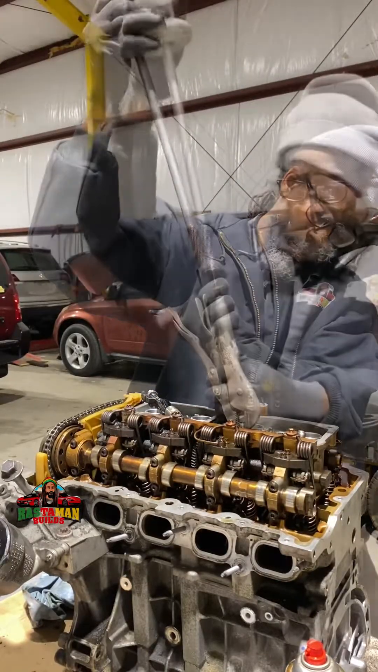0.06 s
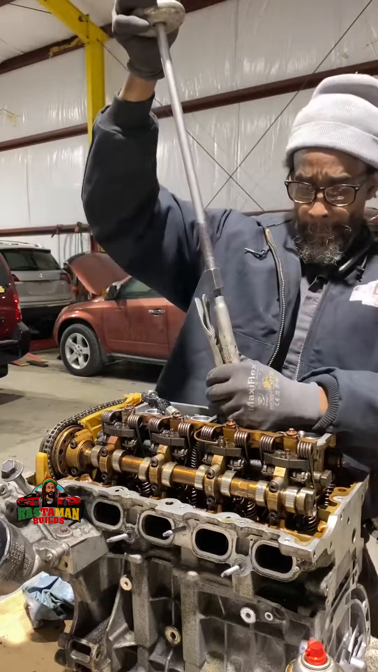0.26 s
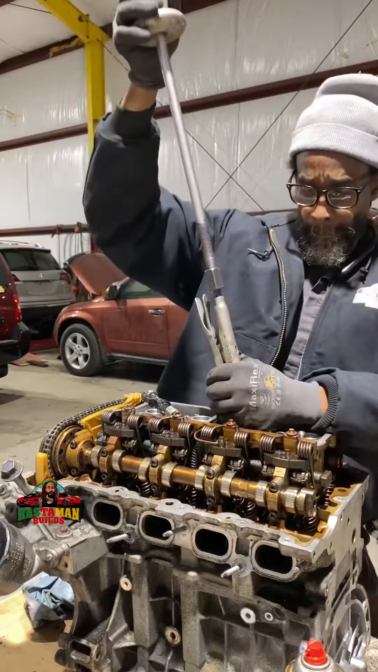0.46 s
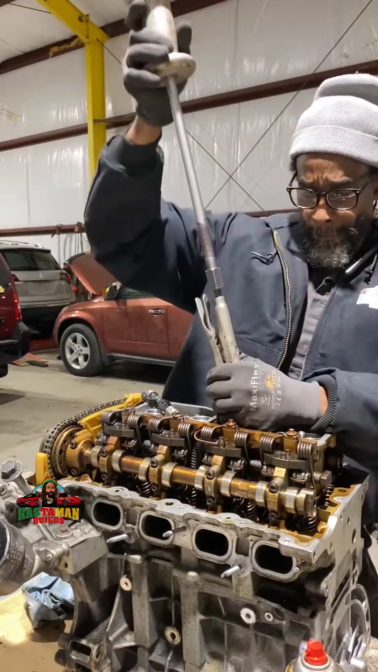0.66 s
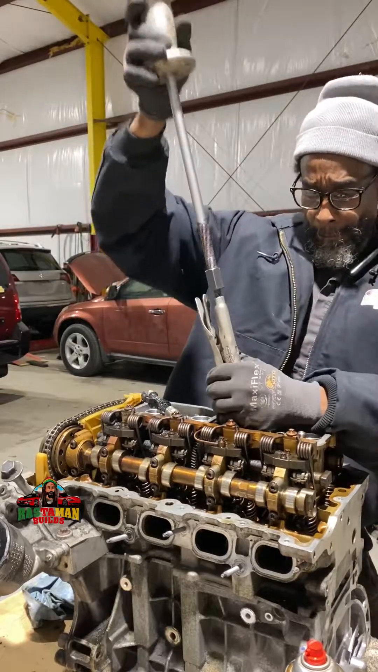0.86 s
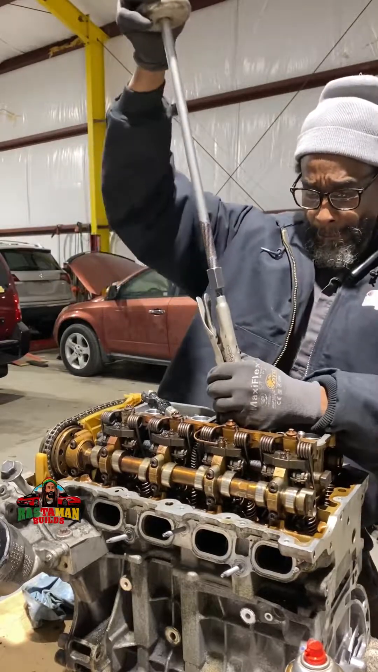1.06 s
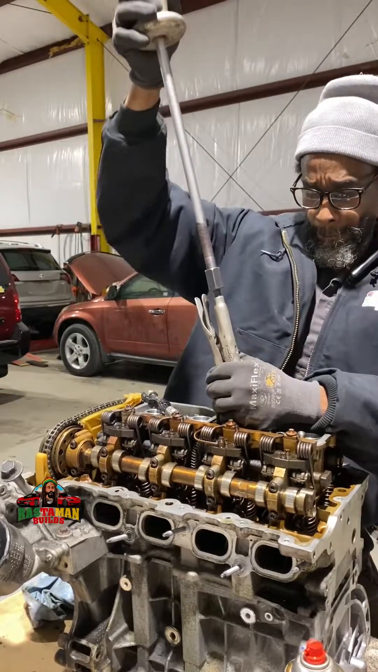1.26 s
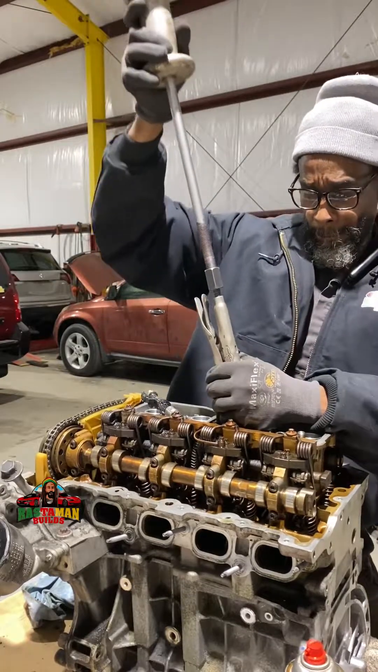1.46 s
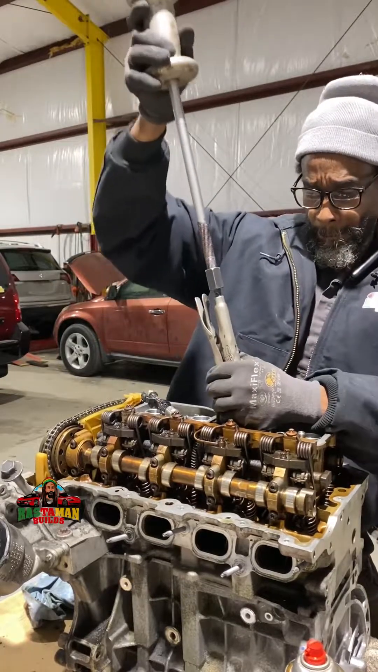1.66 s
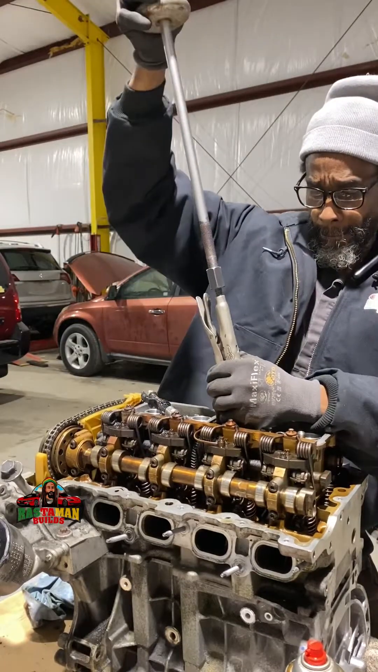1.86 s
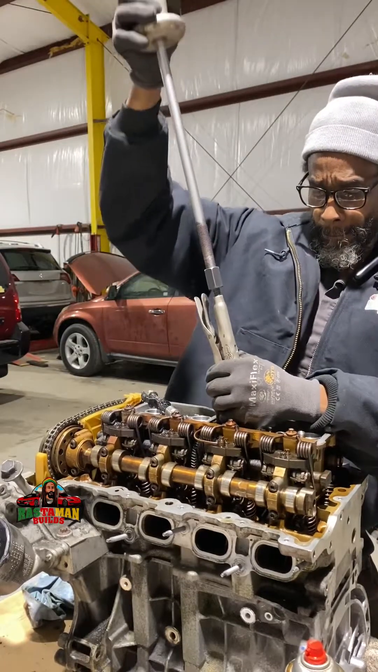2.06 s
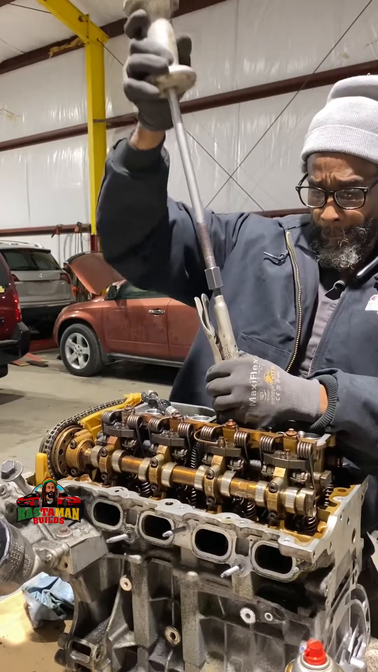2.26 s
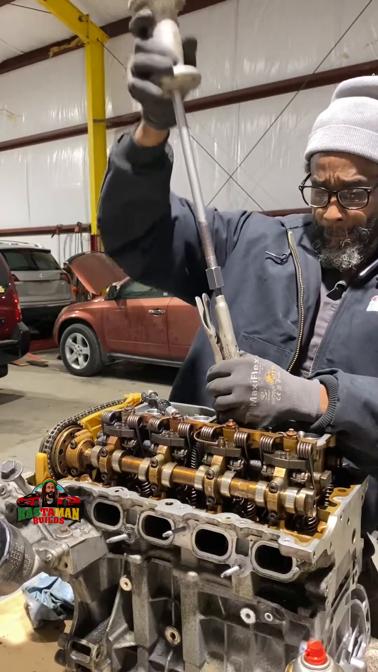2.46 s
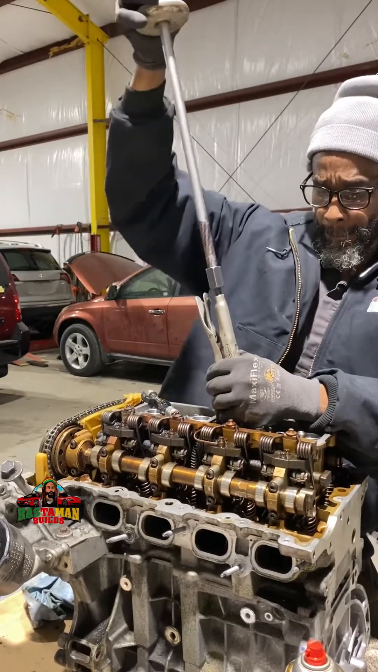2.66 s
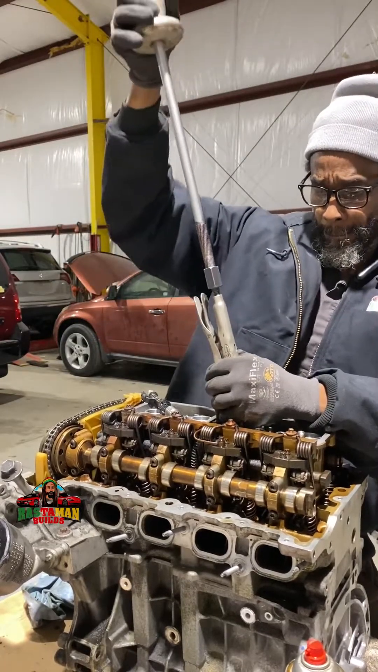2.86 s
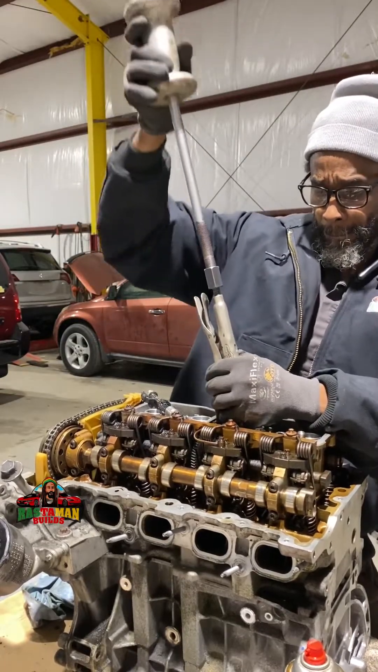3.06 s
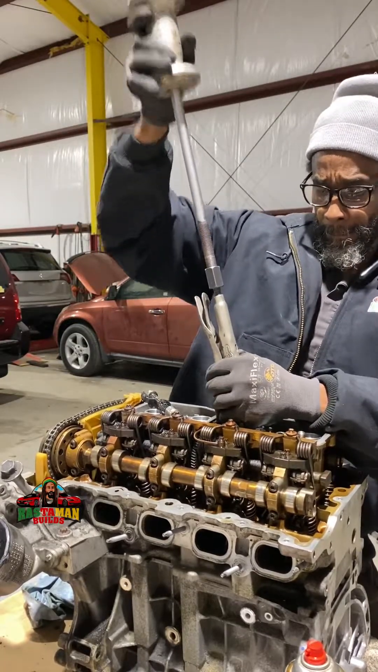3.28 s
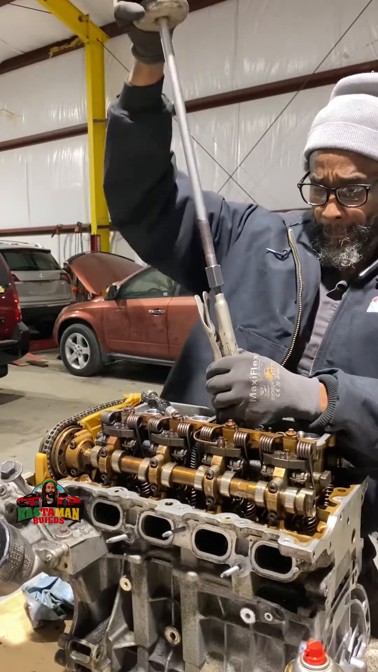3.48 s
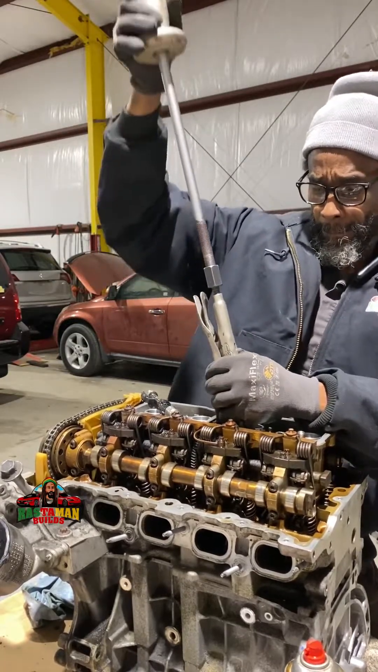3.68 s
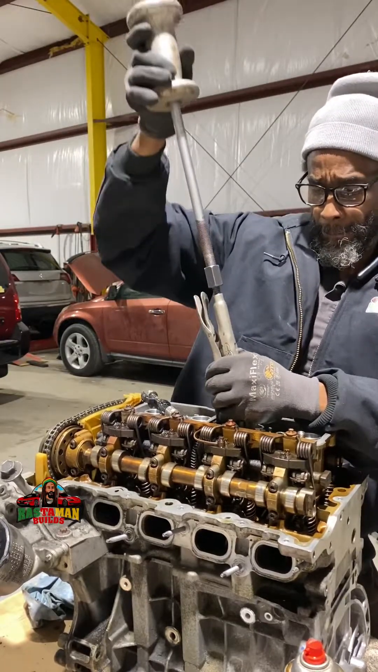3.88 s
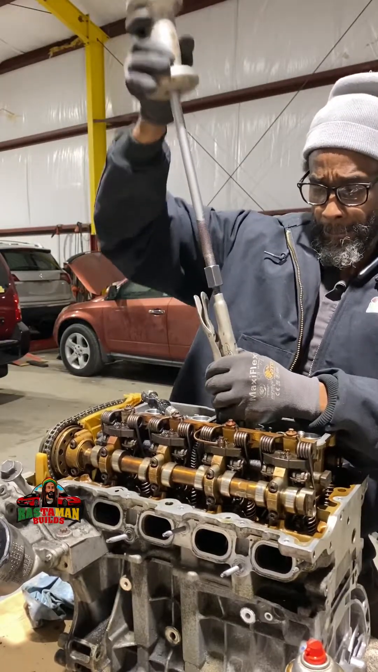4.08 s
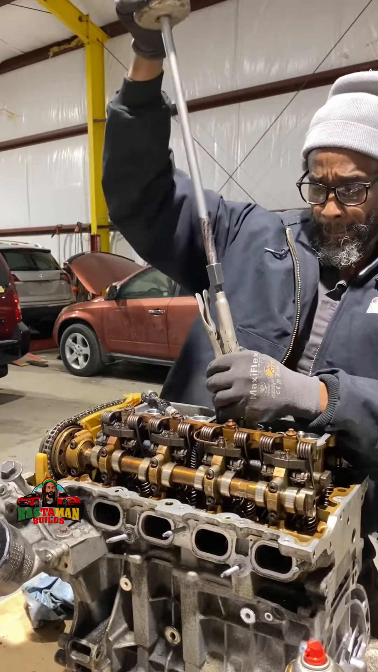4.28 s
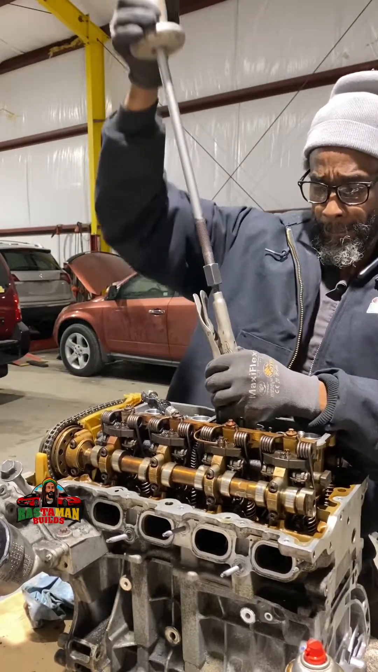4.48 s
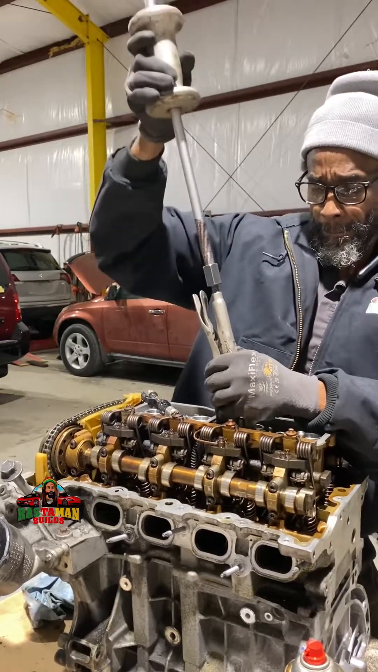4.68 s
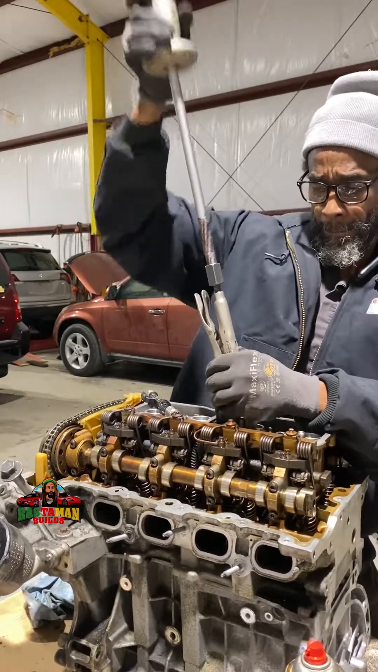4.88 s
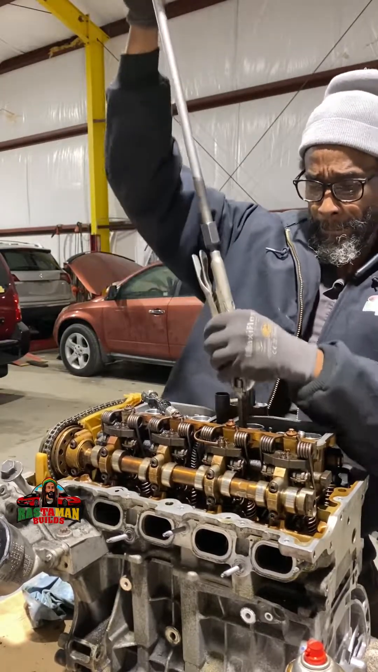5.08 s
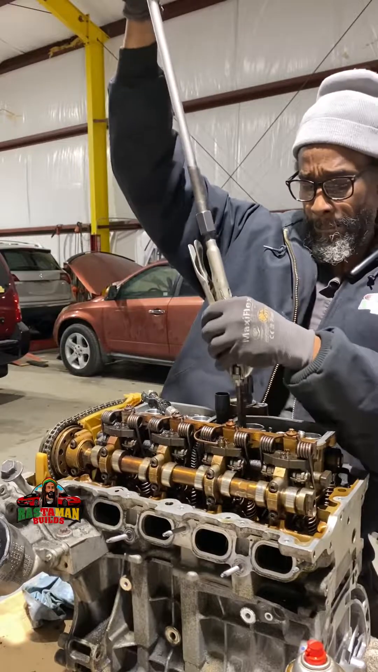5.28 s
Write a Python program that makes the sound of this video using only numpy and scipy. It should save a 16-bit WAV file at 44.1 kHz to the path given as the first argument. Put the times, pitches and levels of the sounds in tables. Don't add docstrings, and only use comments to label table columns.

```python
import sys
import numpy as np
from scipy import signal
from scipy.fft import rfft, irfft
from scipy.io import wavfile

SR = 44100
rng = np.random.default_rng(int(sys.argv[2]) if len(sys.argv) > 2 else 0)


def volts_from_decibels(level):
    exponent = np.asarray(level, float) / 20
    return 10 ** exponent


def dump(signal):
    limited = np.clip(np.atleast_2d(signal).T, -1, 1)
    pcm = np.round(limited * 32767).astype(np.int16)
    wavfile.write(sys.argv[1], SR, pcm)


N = 234948

# start_s, level_db (rms of the first 6 ms), length_ms, dull_db (per octave)
SLAM_EVENTS = [
    (0.1616, -17.5, 3, 3),
    (0.9306, -12, 5.7, -1.7),
    (1.7611, -12, 6.7, 0.3),
    (2.5595, -12.5, 6.5, -0.6),
    (3.3561, -12, 6.2, -0.8),
    (4.165, -12, 8.1, -0.14),
    (4.9309, -11.5, 9.6, -1.1),
]
# start_s, peak_db, strongest_mode_hz, dull_db (per octave), length_ms
RATTLE_EVENTS = [(0.259, -22.5, 2330, 2.5, 4.2), (0.3331, -22.5, 6200, -3.5, 9),
                 (0.4637, -20.5, 2360, 4.5, 10.4), (0.5199, -24.5, 1530, 1.5, 3.7),
                 (0.9887, -23, 6200, 0, 1.3), (1.1239, -16.5, 6180, -3, 2.1), (1.2905, -23, 3560, 5, 8.5),
                 (1.948, -27.5, 4470, 5, 5.4), (2.1083, -20.5, 5920, 0.5, 6.5),
                 (2.5795, -24.5, 2760, -6, 16), (2.7988, -25.5, 2970, 6, 5.3),
                 (3.5292, -33, 2740, 5.5, 7.4), (3.618, -26, 2400, 2.5, 4.7), (3.8168, -40.5, 3200, 7, 7.1),
                 (4.176, -18.5, 2690, 7, 6.8), (4.3573, -25.5, 2460, -2, 22), (4.5376, -35, 2780, -3, 15),
                 (4.945, -17, 3570, -4, 9.3), (4.994, -25, 3000, -14, 12), (5.009, -17.5, 2910, -7, 7.3),
                 (5.1488, -31.5, 6000, -2.5, 8.2), (5.2077, -35, 5000, 1, 13),
                 (5.2971, -19.5, 2160, 8.5, 5.4)]
# start_s, fastest_s, end_s, level_db, low_modes_db
SCRAPE_EVENTS = [
    (0.039, 0.14, 0.18, -59.5, 11.5),
    (0.81, 0.854, .923, -46.5, 7.5),
    (1.643, 1.697, 1.77, -44.5, 4),
    (2.434, 2.505, 2.54, -46.5, 1.5),
    (3.222, 3.28, 3.343, -47.5, 1),
    (4.028, 4.082, 4.16, -48, 1),
    (4.793, 4.85, 4.9, -50, 0.5),
]
# mode_hz, level_db, t60_s
ROD_MODES = [(650, -14, .04), (1930, -6, .05), (2580, 0, .035), (2750, -5, .035), (3000, -6, .03),
             (3580, -1, .035), (3750, -6, .04), (4480, -8, .04), (4750, -2, .05), (5100, -6, .03),
             (6100, -3, .03), (6300, -5, .04), (7580, -8, .03), (8600, -5, .04), (10500, -9, .015),
             (15300, -10, .012)]


def unit(x):
    return x / np.sqrt(np.mean(x ** 2) + 1e-20)


def at_hz(points, hz):
    table_hz, table_db = np.array(points).T
    return np.interp(np.log(hz), np.log(table_hz), table_db)


def drift(rate):
    r = np.exp(-80 * np.pi * rate / SR)
    slow = signal.lfilter([1], [1, -2 * r, r * r], rng.standard_normal(N // 40 + 2002))[2000:]
    return np.interp(np.arange(N) / 40, np.arange(len(slow)), unit(slow))


def resonance(x, hz, width_hz):
    r = np.exp(-np.pi * width_hz / SR)
    feed = np.array([1, 0, -1]) * (1 - r * r) / 2
    return signal.lfilter(feed, [1, -2 * r * np.cos(2 * np.pi * hz / SR), r * r], x)


def ring(x, hz, t60):
    r, w = volts_from_decibels(-60 / (t60 * SR)), 2 * np.pi * hz / SR
    return signal.lfilter([0, np.sin(w)], [1, -2 * r * np.cos(w), r * r], x + 1e-18)


def tinted(x, gain_db):
    hz = np.maximum(np.fft.rfftfreq(x.shape[-1], 1 / SR), 10)
    return irfft(rfft(x) * volts_from_decibels(gain_db(hz)), x.shape[-1])


def add(out, piece, s):
    i = int(s * SR)
    out[i:i + len(piece)] += piece[:N - i]


def rise_and_fall(age, top_s, top_db, rise_db_per_s, fall_db_per_s):
    climb_db = rise_db_per_s * np.maximum(top_s - age, 0)
    return volts_from_decibels(top_db - climb_db - fall_db_per_s * np.maximum(age - top_s, 0))


def rumble_and_hum():
    # time_s, level_db
    rumble_levels = [(0.0, -71.5), (0.15, -61), (0.36, -61), (0.71, -64.5), (0.96, -65), (1.11, -53),
                     (1.26, -50.5), (1.59, -60.5), (2.03, -54), (2.39, -62), (2.83, -53.5), (3.19, -61),
                     (3.72, -53.5), (4.14, -63.5), (4.52, -50.5), (4.98, -63), (5.09, -64.5), (5.33, -79.5)]
    # freq_hz, density_db (per Hz)
    rumble_spectrum = [(15, -23), (25, 5), (63, 9.5), (93, 6.5), (175, 1.5), (229, -14), (401, -15.5),
                       (477, -15.5), (1160, -26), (2360, -27.5), (2500, -63), (3250, -22.5), (5500, -120)]
    hum_hz, hum_width_hz, hum_db = 475, 14, -7
    time_s, level_db = np.transpose(rumble_levels)
    bass_db = level_db - 2
    upper_db = -65 + level_db - level_db.mean()
    white, now = rng.standard_normal(N), np.arange(N) / SR
    rumble = tinted(white, lambda hz: at_hz(rumble_spectrum, hz))
    bass = unit(signal.sosfilt(signal.butter(4, 240, "low", fs=SR, output="sos"), rumble))
    upper = unit(signal.sosfilt(signal.butter(4, 240, "high", fs=SR, output="sos"), rumble))
    hum = unit(resonance(resonance(white, hum_hz, hum_width_hz), hum_hz, hum_width_hz))
    out = bass * volts_from_decibels(np.interp(now, time_s, bass_db) + 3.9 * drift(6.9))
    murmur = upper * volts_from_decibels(1.1 * drift(8.1)) + volts_from_decibels(hum_db) * hum
    return out + murmur * volts_from_decibels(np.interp(now, time_s, upper_db))


def dull_knocks():
    # start_s, peak_db, pitch_hz
    handling_knocks = [(0.334, -51.5, 270), (1.036, -49.5, 333), (1.164, -43.5, 372), (1.239, -44, 335),
                       (1.29, -43, 500), (1.401, -38, 264), (1.517, -49.5, 660), (1.91, -64, 334),
                       (2.009, -52, 330), (2.232, -46, 545), (2.372, -48, 382), (2.504, -50, 403),
                       (2.672, -44, 340), (2.796, -51, 324), (2.889, -35.5, 338), (3.025, -41, 510),
                       (3.473, -43, 330), (3.592, -47, 543), (3.662, -45.5, 530), (3.7, -42, 494),
                       (3.772, -40.5, 266), (3.846, -45, 377), (3.953, -40.5, 261), (4.078, -46, 335),
                       (4.516, -41, 510), (4.576, -45.5, 331), (4.632, -44, 530), (4.77, -45.5, 258),
                       (4.968, -33.5, 696), (5.059, -43, 625)]
    jog_db, jog_hz = -26, 621
    jogs = [(s, peak_db + jog_db, jog_hz) for s, peak_db, *_ in RATTLE_EVENTS]
    out, t = np.zeros(N), np.arange(4000) / SR
    for s, peak_db, hz in handling_knocks + jogs:
        puff = rng.standard_normal(len(t)) * np.minimum(t / 0.001, 1) * volts_from_decibels(-60 * t / 0.077)
        pitched = resonance(resonance(puff, hz, 110), hz, 110)
        broad = resonance(resonance(puff, 433, 530), 320, 560)
        deep = resonance(resonance(puff, 152, 110), 152, 110)
        body = unit(pitched) + volts_from_decibels(-4.5) * unit(broad) + volts_from_decibels(-2) * unit(deep)
        add(out, volts_from_decibels(peak_db - 1) * body / np.abs(body).max(), s)
    return out


def hall_level():
    # first_ring_db, swell_top_s, swell_db, fall_db_per_s
    washes = [
        (-47, 0.14, -60, 26),
        (-48.5, 0.27, -49.5, 49),
        (-47.5, 0.18, -51, 40),
        (-46, 0.2, -50, 40.5),
        (-46.5, 0.2, -51, 47.5),
        (-45, 0.19, -50.5, 43),
        (-42.5, 0.19, -50.5, 55),
    ]
    start_s, first_ring_db_per_s, swell_db_per_s = 0.026, 195.5, 36.5
    dying_db_per_s2, still_db = 8.5, -81
    t, gain = np.arange(N) / SR, volts_from_decibels(still_db)
    for (s, *_), (ring_db, top_s, swell_db, fall_db_per_s) in zip(SLAM_EVENTS, washes):
        age = t - s - start_s
        onset = np.clip(age / 0.05 + 1, 0, 1) ** 2
        first = volts_from_decibels(ring_db - first_ring_db_per_s * np.maximum(age, 0))
        swell = rise_and_fall(age, top_s - start_s, swell_db, swell_db_per_s, fall_db_per_s)
        swell = swell * volts_from_decibels(-dying_db_per_s2 * np.maximum(age - top_s, 0) ** 2)
        gain = gain + onset * np.hypot(first, swell)
    return gain


def hall():
    # freq_hz, level_db
    wash_spectrum = [(500, -18), (1000, -14.5), (1500, -11), (2200, -6), (3000, -4.5), (4100, -5.5),
                     (5500, -3), (7500, -6), (10000, -10), (11000, -12), (12000, -19), (14000, -19),
                     (15500, -17)]
    # mode_hz, width_hz, level_db (over the wash)
    steel_peaks = [(1930, 60, 2), (2580, 90, 3), (2740, 80, 3), (2950, 70, 1), (3590, 60, 3), (3750, 70, 3),
                   (4480, 50, 2), (4630, 50, 5), (4740, 40, 15), (5000, 60, 3), (6090, 80, 4),
                   (6290, 100, 7), (8650, 90, 7), (10900, 120, 3)]
    air_db_per_s = 34
    soak_db_per_s, soak_hz = 3.5, 1500
    t, slam_times = np.arange(N) / SR, np.r_[-.6, np.array(SLAM_EVENTS)[:, 0]]
    age = t - slam_times[np.searchsorted(slam_times, t) - 1] - .2
    white = rng.standard_normal((2, N))
    steel = sum(volts_from_decibels(level_db + 2 * drift(5)) * resonance(white, hz, width)
                for hz, width, level_db in steel_peaks)
    white = white + steel
    out, edges, together = 0, 500 * 2 ** np.arange(0, 5.1, 1 / 3), drift(9)
    for k, (low, high) in enumerate(zip(edges, edges[1:])):
        hz = np.sqrt(low * high)
        band_filter = signal.butter(2, [low, high], "band", fs=SR, output="sos")
        band = signal.sosfilt(band_filter, white[k % 2])
        air_db = air_db_per_s * (hz / 10000) ** 1.7 * age
        soak_db = soak_db_per_s * np.exp(-np.log2(hz / soak_hz) ** 2) * age
        flutter_db = 0.39 * together + 1.2 * drift(28)
        out = out + band * volts_from_decibels(at_hz(wash_spectrum, hz) - air_db - soak_db + flutter_db)
    return unit(out) * volts_from_decibels(8) * hall_level()


def rod_low_rings():
    # start_s, level_db, t60_s
    long_rings = [
        (0.172, -33.5, 0.076),
        (0.262, -47.5, 0.3),
        (0.518, -47.5, 0.69),
        (1.125, -64, 0.13),
        (1.287, -42.5, 0.42),
        (2.109, -47.5, 0.49),
        (5.01, -60, 0.24),
    ]
    t, drive = np.arange(20000) / SR, np.zeros(N)
    for s, level_db, t60 in long_rings:
        add(drive, volts_from_decibels(level_db - 60 * t / t60), s)
    white = rng.standard_normal(N)
    hollow = resonance(white, 1010, 40) + volts_from_decibels(2.5) * resonance(white, 1480, 93)
    return drive * unit(hollow + volts_from_decibels(-3.5) * resonance(white, 1250, 1300))


def throws():
    speed_up_db, coast_db_per_s = 14, 50.5
    t, high, low = np.arange(N) / SR, 0, 0
    for start, top, end, level_db, low_db in SCRAPE_EVENTS:
        gate = np.clip((t - start) / 0.033 + 1, 0, 1) ** 2 * volts_from_decibels(-900 * np.maximum(t - end, 0))
        gain = gate * rise_and_fall(t, top, level_db, speed_up_db / (top - start), coast_db_per_s)
        high, low = high + gain, low + gain * volts_from_decibels(low_db)
    return high, low


def scrape():
    # mode_hz, width_hz, level_db
    rubbed_modes = [(990, 50, -5), (1460, 60, -1), (1650, 60, -3), (1940, 60, -4), (2620, 80, 2),
                    (2780, 80, 3), (3250, 90, -2), (3580, 80, -2), (4980, 150, -6), (6300, 150, 0),
                    (7700, 300, -15), (9130, 200, -17), (10550, 250, -15), (12500, 250, -21),
                    (14150, 200, -27), (15200, 500, -30)]
    caught = rng.random(N) < 9000 / SR
    strength = volts_from_decibels(2 * np.minimum(rng.exponential(1, N), 4))
    catches = caught * strength * rng.choice([-1, 1], N) * volts_from_decibels(2 * drift(46.1))
    modes = [(-1) ** k * volts_from_decibels(level_db + 1.76 * drift(31)) * resonance(catches, hz, width)
             for k, (hz, width, level_db) in enumerate(rubbed_modes)]
    hiss = tinted(catches, lambda hz: -16 - 9 * np.abs(np.log2(hz / 2500)))
    times = np.array(SCRAPE_EVENTS)[:, [0, 2]].ravel()
    climb_hz = np.interp(np.arange(N) / SR, times, [2700, 4000] * len(SCRAPE_EVENTS))
    roughness = unit(resonance(resonance(catches, 16, 90), 16, 90))
    climb = roughness * np.sin(2 * np.pi * np.cumsum(climb_hz) / SR)
    high = unit(sum(modes[4:]) + hiss) + volts_from_decibels(-9) * climb
    low = unit(sum(modes[:4])) * volts_from_decibels(-8.5)
    high_gain, low_gain = throws()
    return high * high_gain + low * low_gain


def strike(length_ms, dull_db, modes_db, tail_db, tail_t60):
    # freq_hz, level_db
    steel_spectrum = [(200, -30), (500, -12), (1000, -19), (1500, -16), (2200, -9), (3000, -4), (4100, -6),
                      (5500, -4), (7500, -5), (10000, -3), (12000, -9), (13500, -13), (15300, -7),
                      (16000, -14)]
    t = np.arange(6000) / SR
    shape = np.exp(-(t * 1000 / length_ms) ** 2) * np.minimum(t / .0005, 1)
    bounces_db = 3 * np.minimum(rng.exponential(1, len(t) // 20), 3).repeat(20)
    crackle = rng.standard_normal(len(t)) * volts_from_decibels(bounces_db)

    def tilt(hz):
        return at_hz(steel_spectrum, hz) - dull_db * np.log2(np.maximum(hz, 2500) / 2500)

    burst = unit(tinted(crackle, tilt)) * shape
    tail = unit(tinted(rng.standard_normal(len(t)), tilt)) * volts_from_decibels(tail_db - 60 * t / tail_t60)
    rung = sum(volts_from_decibels(mode_db + level_db) * ring(burst + .5 * tail, hz, t60)
               for mode_db, (hz, level_db, t60) in zip(modes_db, ROD_MODES))
    whole = burst + tail + rung
    return whole / whole[:265].std()


def rattles():
    out, rod_hz = np.zeros(N), np.array(ROD_MODES)[:, 0]
    for s, peak_db, hz, dull_db, length_ms in RATTLE_EVENTS:
        dull_db = max(dull_db, 0)
        favoured_db = 15 * np.exp(-(np.log2(rod_hz / hz) / 0.085) ** 2)
        modes_db = -26 + favoured_db - dull_db * np.log2(np.maximum(rod_hz, 2500) / 2500) / 2
        rattle = strike(length_ms, dull_db, modes_db, tail_db=-15, tail_t60=0.28)
        add(out, volts_from_decibels(peak_db - 13) * rattle, s)
    return out


def touches():
    # start_s, level_db (rms), dull_db (per octave), length_ms
    touch_events = [(0.1508, -29, -2.5, 6.7), (0.9233, -30.7, 7.5, 7.8), (1.651, -51.5, 13, 3.9),
                    (1.7539, -31.5, 13.5, 11), (2.461, -46.5, 12.5, 2.3), (2.5514, -30, 10, 9),
                    (3.3446, -22, -3, 3.3), (3.35, -29.5, 7.5, 4.6), (4.157, -30.5, 3, 6),
                    (4.9006, -23.5, -4, 7.2), (4.91, -33, 5.5, 12), (4.922, -30, 5, 9)]
    out = np.zeros(N)
    for s, level_db, dull_db, length_ms in touch_events:
        modes_db = -30 + 4 * rng.standard_normal(len(ROD_MODES))
        add(out, volts_from_decibels(level_db) * strike(length_ms, dull_db, modes_db, tail_db=-13, tail_t60=.12), s)
    return out


def engine_thuds():
    # mode_hz, level_db, t60_s
    engine_modes = [(103.6, -8, 0.16), (125, -26.5, 0.096), (158.8, -11.5, 0.24), (185.5, 1.5, 0.099),
                    (219.5, -6.5, 0.089), (262.7, -3, 0.056)]
    # level_db, ring_stretch (times t60), grip_db
    jolts = [
        (-28.5, 2.4, 3.5),
        (-29, 1.23, -6),
        (-29.5, 1.44, -14),
        (-30, 1.27, -4.5),
        (-38, 1.6, -2),
        (-39.5, 1.6, 1.5),
        (-40, 1.5, 8.5),
    ]
    travel_s = 0.00296
    out, push = np.zeros(N), np.pad(np.hanning(60), (0, 16000)) / 30
    for (s, *_), (thud_db, stretch, grip_db) in zip(SLAM_EVENTS, jolts):
        thud = sum(volts_from_decibels(mode_db) * ring(push, hz, t60 * stretch) for hz, mode_db, t60 in engine_modes)
        grip = volts_from_decibels(grip_db) * (ring(push, 330, 0.047) + ring(push, 620, 0.049))
        add(out, volts_from_decibels(thud_db + 1) * (thud + grip), s + travel_s)
    return out


def slams():
    out = np.zeros(N)
    for s, level_db, length_ms, dull_db in SLAM_EVENTS:
        modes_db = -32 + 3.8 * rng.standard_normal(len(ROD_MODES))
        slam = strike(length_ms, dull_db, modes_db, tail_db=-11.5, tail_t60=0.074)
        add(out, volts_from_decibels(level_db) * slam, s)
    return out


def scene():
    # freq_hz, level_db
    scatter_spectrum = [(40, -27), (250, -15), (600, -2.5), (1300, -7.5), (4000, -7.5), (8000, -13.5),
                        (16000, -31.5)]
    port_lag = 2.25
    spread = rumble_and_hum() + dull_knocks() + hall() + rod_low_rings() + scrape()
    near = rattles() + touches() + engine_thuds() + slams()
    scattered = np.roll(spread + volts_from_decibels(-8) * near, 40) * drift(70)
    unlike = tinted(scattered, lambda hz: at_hz(scatter_spectrum, hz))
    left, right = near + spread + unlike, near + spread - unlike
    hz = np.fft.rfftfreq(N, 1 / SR)
    shading = volts_from_decibels(1.2 * np.exp(-np.log2((hz + 1) / 280) ** 2 / 3))
    delay = np.exp(-2j * np.pi * hz * port_lag / SR)
    right = irfft(rfft(right) * shading * delay, N)
    return np.array([left, right])


def top_cut(x):
    return signal.sosfilt(signal.butter(12, 16960, fs=SR, output="sos"), x)


def record(dry):
    cut = signal.sosfilt(signal.cheby2(10, 45, 16700, fs=SR, output="sos"), dry)
    cut = signal.sosfilt(signal.butter(3, 55, "high", fs=SR, output="sos"), cut)
    return top_cut(np.clip(cut, -.99, .99))


dry = scene()
out = record(dry)
dump(out)
```